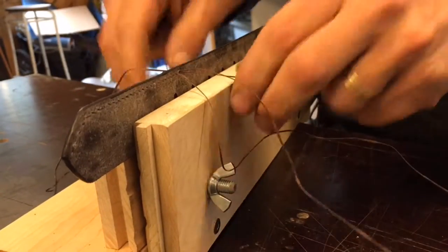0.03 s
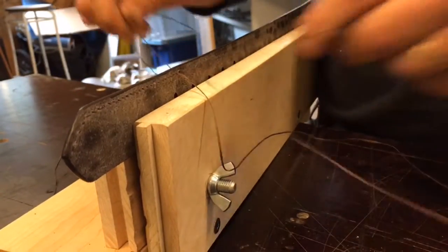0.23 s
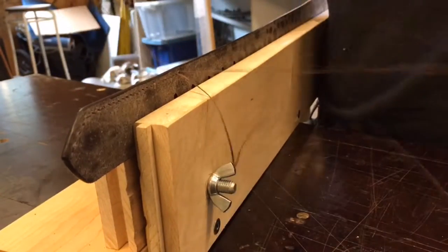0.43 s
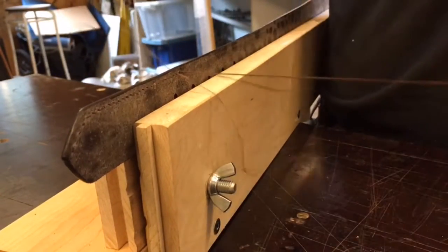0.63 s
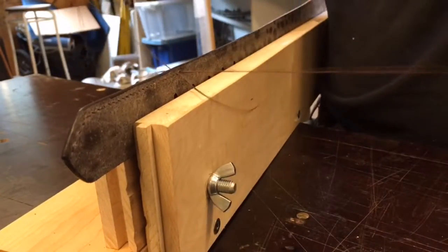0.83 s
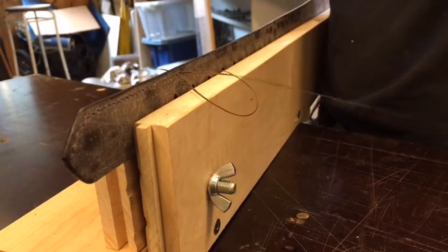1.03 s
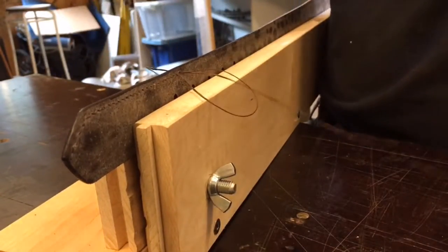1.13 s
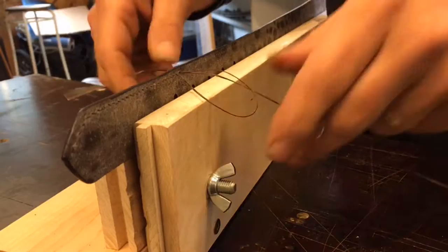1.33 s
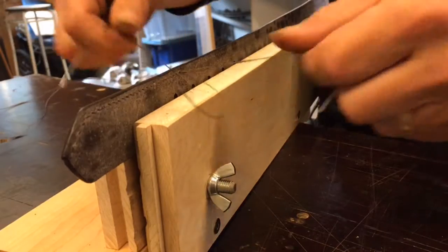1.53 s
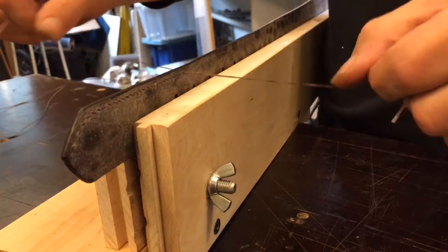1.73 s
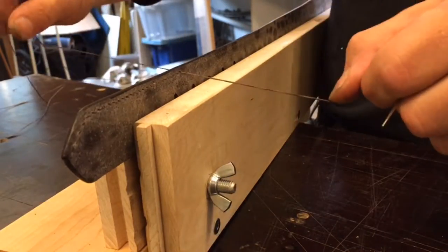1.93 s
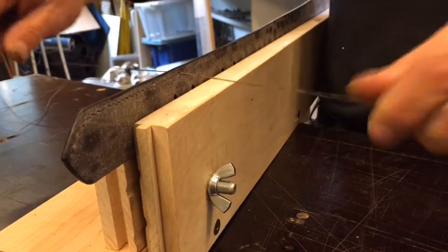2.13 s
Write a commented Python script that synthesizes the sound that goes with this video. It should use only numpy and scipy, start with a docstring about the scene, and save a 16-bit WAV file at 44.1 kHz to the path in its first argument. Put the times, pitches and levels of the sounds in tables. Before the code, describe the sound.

Thread rasps through leather from about 0.2 to 0.9 seconds, close by, making a wooden clamp drone and groan. Around 0.8 seconds it snags and snaps tight with soft, low thuds. From 1.1 to 1.4 seconds fingers rustle, a needle ticks and the clamp is bumped hollowly. A shorter pull with small squeaks runs from 1.6 to 1.9 seconds. A faint tick comes near 2.2 seconds, over quiet workshop hum.

```python
"""Waxed thread is drawn through leather held in a wooden stitching clamp, over a quiet workshop hum.
Fingers rustle, then one long pull rasps through the hole and makes the clamp drone and groan.
As it ends, the thread snags and snaps tight, and the clamp rocks on the bench with soft thuds.
The hands come back and bump the clamp, the needle ticks, and the taut thread whistles faintly.
A short second pull draws the stitch tight, with small squeaks and one last faint tick."""
import sys
import numpy as np
from scipy import signal
from scipy.fft import rfft, irfft
from scipy.io import wavfile

SR = 44100
rng = np.random.default_rng(int(sys.argv[2]) if len(sys.argv) > 2 else 0)


def persist_wave(psi):
    """Save psi, clipped to +-1, as 16-bit WAV."""
    counts = np.round(np.clip(psi, -1, 1) * 32767).astype(np.int16)
    wavfile.write(sys.argv[1], SR, np.atleast_2d(counts).T)


N = 97020
T = np.arange(N) / SR
FREQ_HZ = np.arange(N // 2 + 1) * SR / N


def from_db(db):
    """Turn decibels into a gain."""
    return 10 ** (np.asarray(db) / 20)


def rms_one(x):
    """Scale a sound to an average strength (rms) of 1."""
    return x / np.sqrt(np.mean(x ** 2) + 1e-20)


def level_curve(rows):
    """Join (time_s, level_db) points into a decibel curve, silent before and after."""
    return np.interp(T, *np.transpose(rows), left=-140, right=-140)


def coloured(x, colour):
    """Give plain noise a tone colour, a balance of low and high; rms 1."""
    hz, db = np.transpose(colour)
    freq = np.maximum(FREQ_HZ, 1)
    gain = from_db(np.interp(np.log(freq), np.log(hz), db))
    bass_cut = np.sqrt(1 + (hz[0] / freq) ** 4)
    return rms_one(irfft(rfft(x) * gain / bass_cut, N))


def drift(rate_hz):
    """A smooth random wobble; rms 1."""
    return rms_one(irfft(rfft(rng.standard_normal(N)) / (1 + (FREQ_HZ / rate_hz) ** 2), N))


def narrow_noise(phase, width_hz):
    """A wavering band of noise around one pitch."""
    return drift(width_hz) * np.cos(phase) + drift(width_hz) * np.sin(phase)


def tiny_slips(per_s, spread_db):
    """Rubbing is many tiny random slips of uneven size; rms 1."""
    sizes = from_db(spread_db * np.minimum(rng.exponential(1, N), 5))
    signs = rng.choice([-1, 1], N)
    return rms_one(sizes * signs * (rng.random(N) < per_s / SR))


def resonance(x, hz, width_hz):
    """Let a sound ring at one pitch, and trim away what lies far from it."""
    r = np.exp(-np.pi * width_hz / SR)
    feedback = [1, -2 * r * np.cos(2 * np.pi * hz / SR), r * r]
    ringing = signal.lfilter(np.array([1, 0, -1]) * np.sqrt((1 - r * r) / 2), feedback, x)
    octave = signal.butter(1, [hz / np.sqrt(2), hz * np.sqrt(2)], "band", fs=SR, output="sos")
    return signal.sosfilt(octave, ringing)


def burst(start_s, swell_s, fade_s):
    """A loudness shape that swells, then dies away by 60 dB every fade_s."""
    age = np.maximum(T - start_s, 0)
    return (1 - np.exp(-age / swell_s)) * np.exp(-np.log(1000) * age / fade_s)


def ring(start_s, hz, swell_s, fade_s):
    """One tone, pushed softly into ringing."""
    age = np.maximum(T - start_s, 0)
    soft_start = 1 - np.exp(-age / swell_s)
    return soft_start * burst(start_s, swell_s, fade_s) * np.sin(2 * np.pi * hz * age)


def noise_bursts(rows, colour, swell_s):
    """Short dying bursts of noise, one for each row."""
    loudness = sum(from_db(db) * burst(start, swell_s, fade) for start, db, fade in rows)
    return loudness * coloured(rng.standard_normal(N), colour)


# echoes off the bench top and the board behind it: delay_s, level_db
ECHOES = [(.0031, -10), (.0068, -11)]
def with_echoes(x):
    """Nearby surfaces add echoes so quick that they only colour the sound."""
    return x + sum(from_db(db) * np.interp(T - delay, T, x, left=0) for delay, db in ECHOES)


# tone colour of the room: pitch_hz, relative_db
HUM_COLOUR = [(30, -37), (40, 8), (55, -6), (90, 9), (150, -8.5), (240, -5), (400, -16), (1500, -22),
              (6000, -31), (8000, -31), (15500, -36)]
def workshop_hum():
    """The workshop hums with steady, low noise."""
    return from_db(-49.5) * coloured(rng.standard_normal(N), HUM_COLOUR)


# path of the whistle: time_s, pitch_hz, level_db
WHISTLE_PATH = [(1.24, 11100, -77), (1.369, 11700, -67), (1.56, 11300, -85), (1.901, 11800, -65),
                (1.95, 11030, -68), (2.019, 11250, -66.5), (2.07, 11100, -82)]
def thread_whistle():
    """The taut thread gives a thin, very high, wavering hiss."""
    times, hz, db = np.transpose(WHISTLE_PATH)
    phase = 2 * np.pi * np.cumsum(np.interp(T, times, hz)) / SR
    return from_db(level_curve(np.transpose([times, db]))) * narrow_noise(phase, width_hz=240)


# the swish: start_s, level_db, fade_s
SWISH_BURST = [(1.196, -54.5, 0.33)]
# its tone colour: pitch_hz, relative_db
SWISH_TONE = [(4900, -8), (6300, 6), (7800, -14), (15000, -27)]
def thread_swish():
    """The thread swishes through the fingers."""
    return noise_bursts(SWISH_BURST, SWISH_TONE, swell_s=0.0042)


# loudness of the sliding fingers: time_s, level_db
RUSTLE_LEVELS = [(0, -53), (.13, -49), (.19, -47.5), (.93, -51), (1.0, -80), (1.03, -50.5), (1.09, -84),
                 (1.12, -44.5), (1.19, -67), (1.2, -46), (1.41, -46.5), (1.55, -55.5), (1.75, -44.5),
                 (1.89, -50), (1.94, -53)]
# their tone colour: pitch_hz, relative_db
RUSTLE_COLOUR = [(200, 24), (600, 0.5), (1450, -3), (2100, 0), (4000, -7.5), (4900, -11), (6200, -5.5),
                 (7900, -14.5), (12000, -17)]
def finger_rustle():
    """Fingers slide over thread and leather in tiny slips."""
    slips = with_echoes(tiny_slips(per_s=4200, spread_db=2.5))
    return from_db(level_curve(RUSTLE_LEVELS)) * coloured(slips, RUSTLE_COLOUR)


# short squeaks: start_s, pitch_hz, level_db
SQUEAK_NOTES = [(1.25, 1520, -47.5), (1.79, 1955, -45.5), (1.84, 2206, -52)]
def thread_squeaks():
    """The thread squeaks as it rubs under the fingers."""
    return sum(from_db(db) * burst(start, swell_s=0.038, fade_s=0.39)
               * narrow_noise(2 * np.pi * hz * T, width_hz=130) for start, hz, db in SQUEAK_NOTES)


# light taps: start_s, level_db, fade_s
TICK_BURSTS = [(1.1034, -33.5, 0.023), (1.1792, -47, 0.026), (1.4067, -44.5, 0.022), (1.415, -37, 0.019),
               (2.1834, -53, 0.1)]
# their tone colour: pitch_hz, relative_db
TICK_TONE = [(300, -16), (1500, -7), (2400, -2.5), (3200, -11.5), (9000, -18.5), (15000, -30)]
def needle_ticks():
    """Needle and fingernails make small, sharp ticks."""
    return noise_bursts(TICK_BURSTS, TICK_TONE, swell_s=0.0001)


# catches and scuffs: start_s, level_db, fade_s
SNAG_BURSTS = [(.166, -42.5, 0.092), (.76, -28.5, 0.13), (.7846, -26.5, 0.11), (.8904, -31, 0.25),
               (1.021, -42.5, 0.068), (1.195, -37.5, 0.32), (1.371, -38, 0.14), (1.7125, -36, 0.25)]
# their tone colour: pitch_hz, relative_db
SNAG_TONE = [(200, 26.5), (400, 21.5), (720, 8.5), (1600, 9), (2500, -5.5), (4900, -5), (6000, -12),
             (15000, -25)]
def thread_snags():
    """The thread catches and fingers scuff the wood."""
    return noise_bursts(SNAG_BURSTS, SNAG_TONE, swell_s=0.00033)


# crisp snaps: start_s, level_db, fade_s
SNAP_BURSTS = [(.85, -31, 0.019), (.8904, -32, 0.027), (1.6297, -38.5, 0.022), (1.7125, -41.5, 0.077)]
# their tone colour: pitch_hz, relative_db
SNAP_TONE = [(2500, 9.5), (9000, 3.8), (15000, 5)]
def thread_snaps():
    """The thread gives bright snaps as it tightens."""
    return noise_bursts(SNAP_BURSTS, SNAP_TONE, swell_s=0.00042)


# soft thuds: start_s, level_db, pitch_hz
THUD_NOTES = [(0.133, -20.5, 91), (0.195, -24.5, 75), (0.456, -20, 125), (0.753, -18, 113),
              (0.791, -15, 126), (0.848, -16.5, 110), (0.899, -10, 123), (1.021, -26, 114),
              (1.364, -25.5, 96), (1.615, -27, 88), (1.724, -19, 88), (1.873, -20, 88)]
def bench_thuds():
    """Low thuds sound through the bench: mostly the clamp rocking, while the loudest, near the end of the first
    pull, is the thread drawn taut."""
    return sum(from_db(db) * ring(start, hz, swell_s=0.0079, fade_s=0.14) for start, db, hz in THUD_NOTES)


# bumps on the clamp: start_s, level_db, brightness_db_per_octave
BUMP_HITS = [(0.658, -24.5, -1), (.842, -23.5, -12), (1.017, -41, -15), (1.195, -20.5, 1),
             (1.373, -21.5, -5), (1.723, -20, -12), (1.865, -33.5, -4)]
# tones the clamp rings with: pitch_hz, relative_db, fade_s
CLAMP_TONES = [(236.2, 1, 0.32), (213.9, -6.5, 0.3), (383, -6.5, 0.22), (590, -18.5, 0.23),
               (737, -28, 0.27), (943, -23.5, 0.24), (1340, -25, 0.18)]
def clamp_bumps():
    """The bumped clamp rings hollowly; some bumps are dull, others brighter."""
    swell_cycles = 0.79
    sound = np.zeros(N)
    for start, bump_db, brightness in BUMP_HITS:
        for k, (hz, tone_db, fade) in enumerate(CLAMP_TONES):
            octaves_up = np.log2(hz / CLAMP_TONES[0][0])
            gain = from_db(bump_db + tone_db + brightness * octaves_up)
            direction = (-1) ** k  # neighbouring tones swing opposite ways
            sound += direction * gain * ring(start, hz, swell_cycles / hz, fade)
    return sound


# brief groans: start_s, length_s, pitch_hz, level_db
GROAN_NOTES = [(0.289, 0.095, 395.2, -31.5), (.37, 0.073, 398.8, -33.5), (0.399, 0.097, 616, -34),
               (0.497, 0.068, 368, -29.5), (0.507, 0.11, 608, -36), (0.577, 0.077, 385, -37.5),
               (0.783, 0.046, 396, -29.5)]
def clamp_groans():
    """The thread sticks and slips in step with one clamp tone, which swells, wavers and lets go."""
    waver_rad = 0.34 * drift(rate_hz=72)
    sound = np.zeros(N)
    for start, length, hz, db in GROAN_NOTES:
        swell = np.sin(np.pi * np.clip((T - start) / length, 0, 1))
        sound += from_db(db) * swell * np.sin(2 * np.pi * hz * T + waver_rad)
    return sound


# rubbing of the thread in each pull, before the rasp's boost: time_s, level_db
FIRST_PULL = [(.22, -75), (.27, -53.5), (.34, -47), (.47, -46), (.52, -44.5), (.61, -44), (.74, -46.5),
              (.905, -49.5), (.96, -79)]
SECOND_PULL = [(1.55, -68.5), (1.62, -54.5), (1.65, -59.5), (1.68, -52), (1.725, -59), (1.85, -61.5),
               (1.88, -51), (1.92, -79)]
# tone colour of the rasp: pitch_hz, relative_db
RASP_COLOUR = [(330, -8), (560, 13), (740, -32), (900, -0.5), (1620, 0), (1980, -8), (2500, -1),
               (2920, -11), (3700, -4), (4400, -6), (4900, -17), (5800, -4), (7800, -12.5), (9300, -7),
               (13400, -10), (15800, -13.5)]
# drag of the thread on the clamp: time_s, level_db
DRAG_LEVELS = [(.22, -56.5), (.32, -41.5), (.61, -43.5), (.8, -39.5), (.93, -41), (.98, -61), (1.57, -63.5),
               (1.68, -43.5), (1.8, -61.5), (1.9, -49.5), (1.95, -63)]
# tones of the clamp under that drag: pitch_hz, relative_db
DRONE_TONES = [(88, 2.5), (117, 4.5), (136, -3.5), (262, -1), (306, -2.5), (376, 2.5), (402, -2),
               (545, -11), (602, -7), (863, -15.5), (1035, -21.5), (1544, -14.5), (1660, -20), (2189, -21),
               (2404, -25), (2649, -25)]
def thread_pulls():
    """Fibres slip through the hole; the same slips rasp in the air and make the clamp drone."""
    boost_db, jerk_db = 6.5, 0.97
    rubbing_db = np.maximum(level_curve(FIRST_PULL), level_curve(SECOND_PULL))
    rasp_db = rubbing_db + boost_db + jerk_db * drift(rate_hz=32)
    slips = tiny_slips(per_s=9000, spread_db=2)
    rasp = coloured(with_echoes(slips), RASP_COLOUR)
    drone = sum(from_db(db) * resonance(slips, hz, width_hz=9.7 + 0.007 * hz) for hz, db in DRONE_TONES)
    return from_db(rasp_db) * rasp + from_db(level_curve(DRAG_LEVELS)) * drone


def scene():
    """Add up all the sounds, heard close by in one channel."""
    contacts = thread_snags() + needle_ticks() + thread_snaps() + thread_swish()
    room = workshop_hum()
    pulls = thread_pulls() + clamp_groans()
    fingers = thread_squeaks() + finger_rustle()
    knocks = bench_thuds() + clamp_bumps()
    return (room + thread_whistle() + fingers + contacts + knocks + pulls)[None]


def record(dry):
    """Cut off the very highest treble steeply."""
    cutoff_hz = 15800
    return signal.sosfilt(signal.ellip(12, .1, 80, cutoff_hz, fs=SR, output="sos"), dry)


dry = scene()
out = record(dry)
persist_wave(out)
```